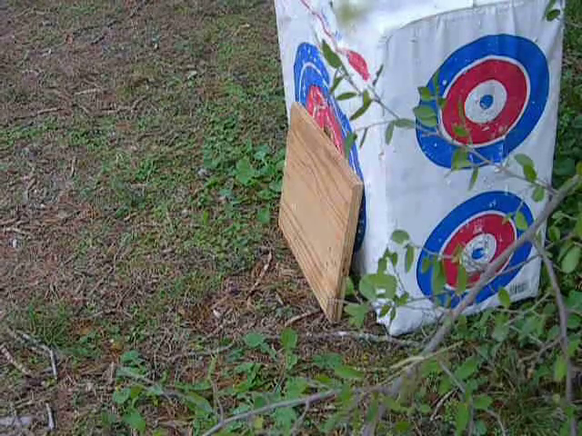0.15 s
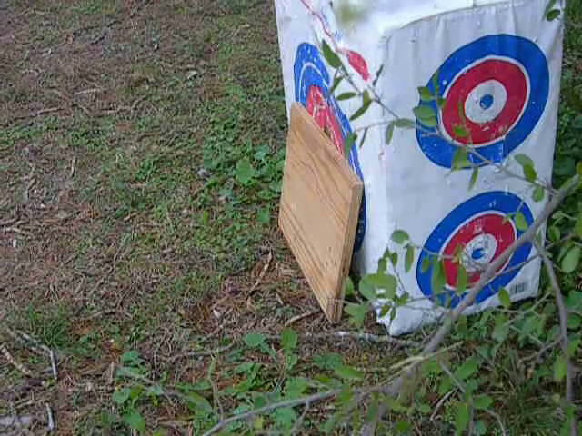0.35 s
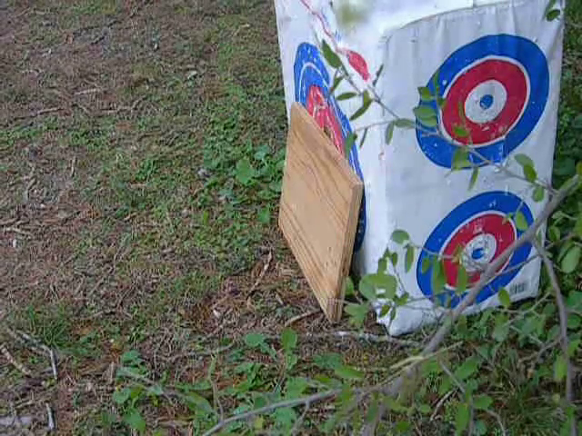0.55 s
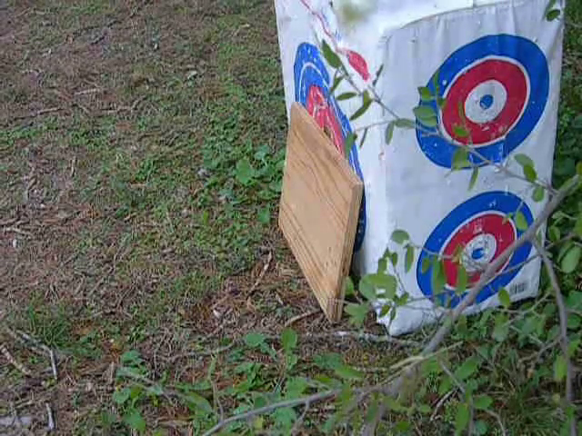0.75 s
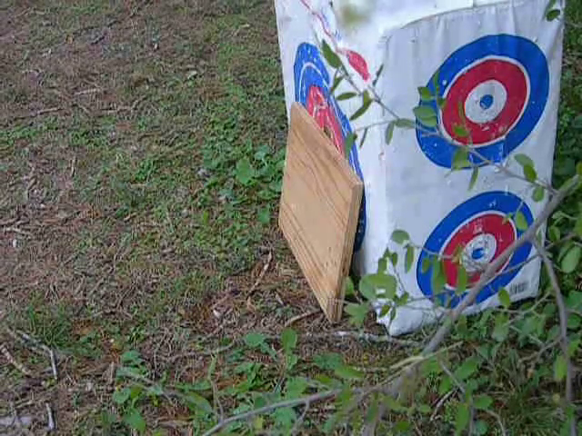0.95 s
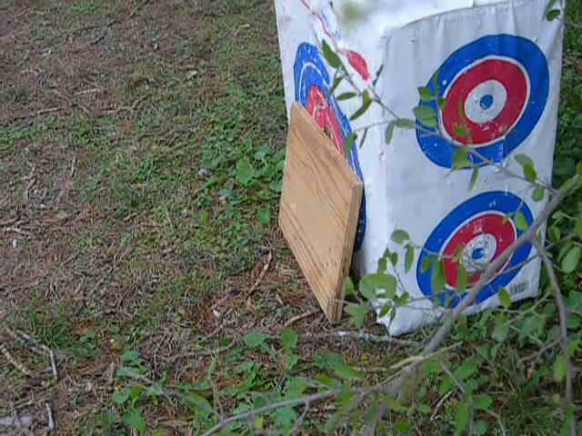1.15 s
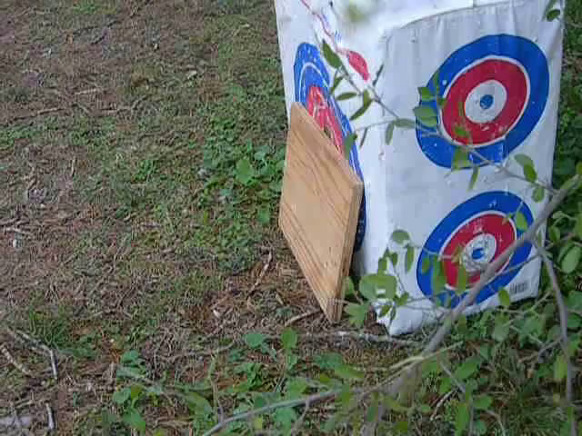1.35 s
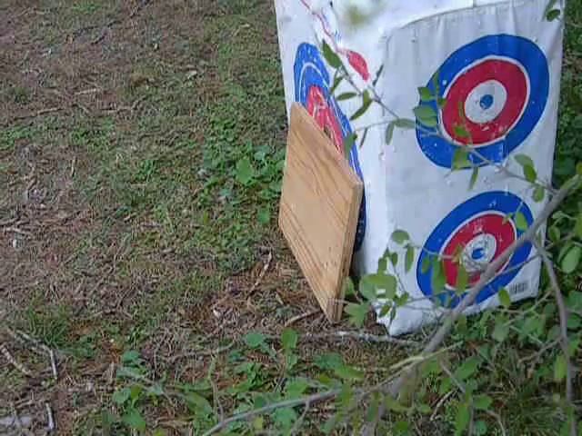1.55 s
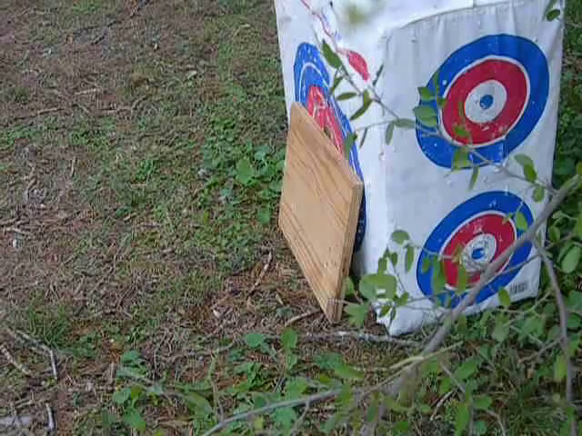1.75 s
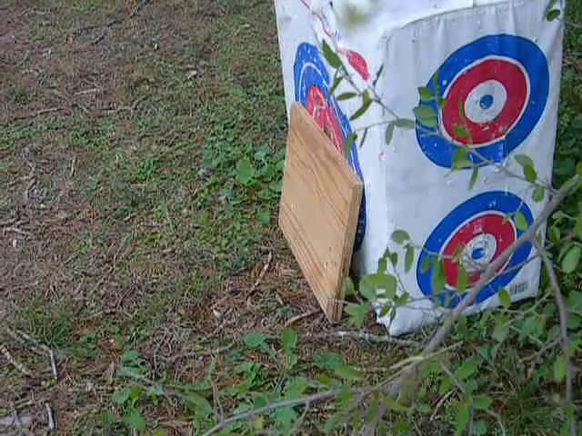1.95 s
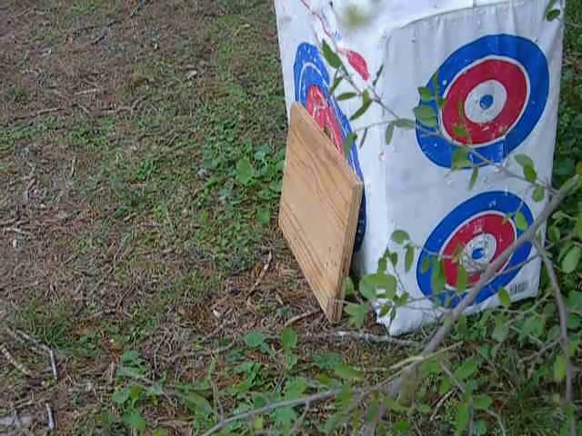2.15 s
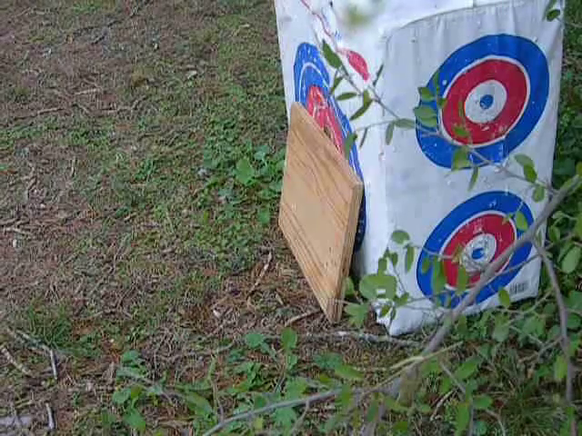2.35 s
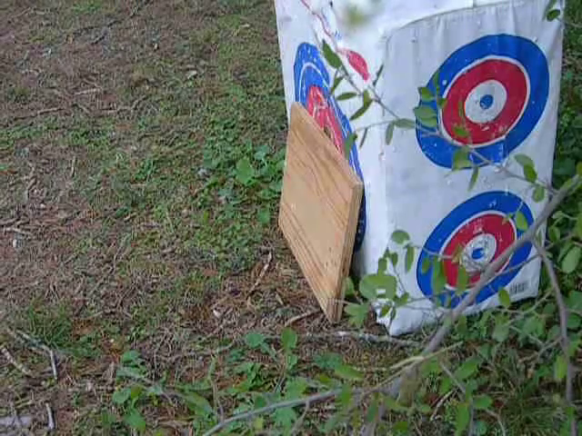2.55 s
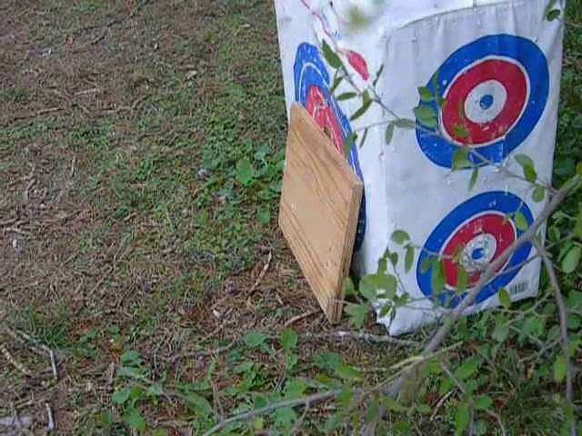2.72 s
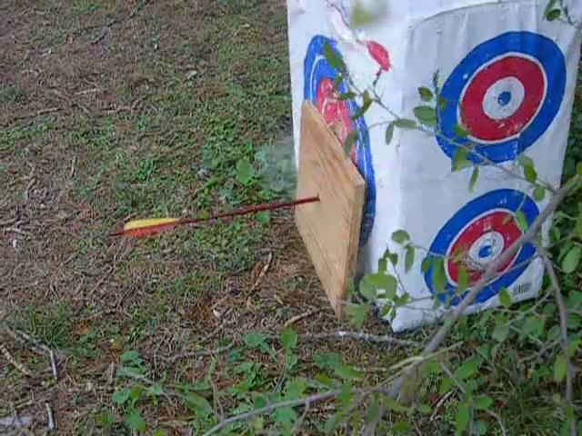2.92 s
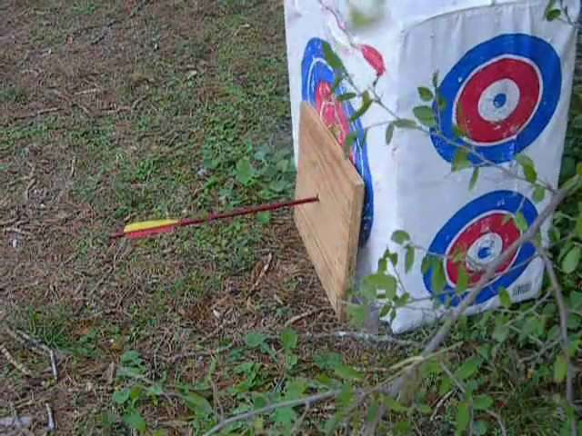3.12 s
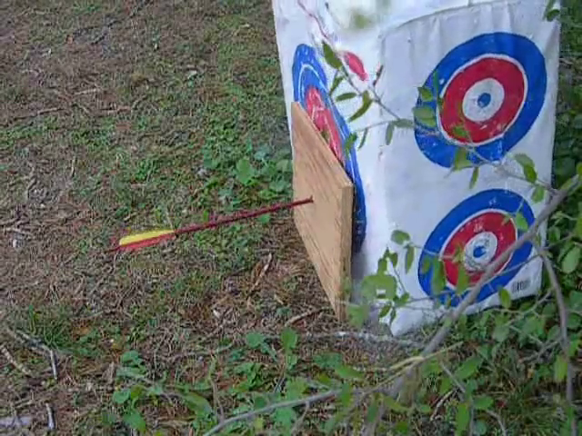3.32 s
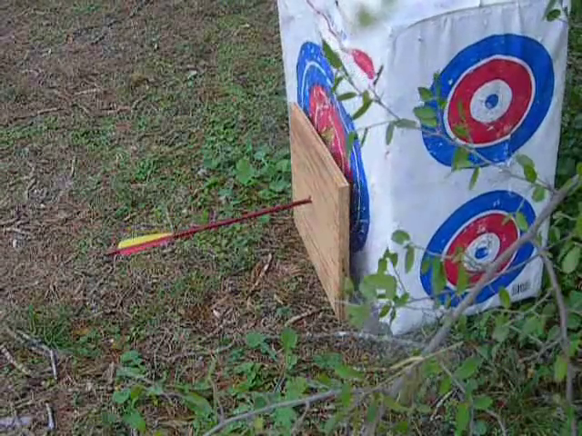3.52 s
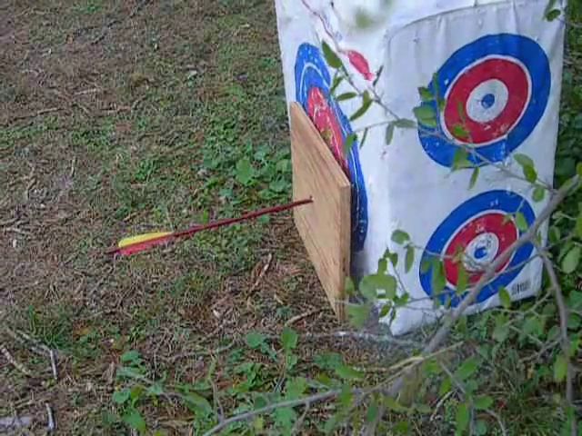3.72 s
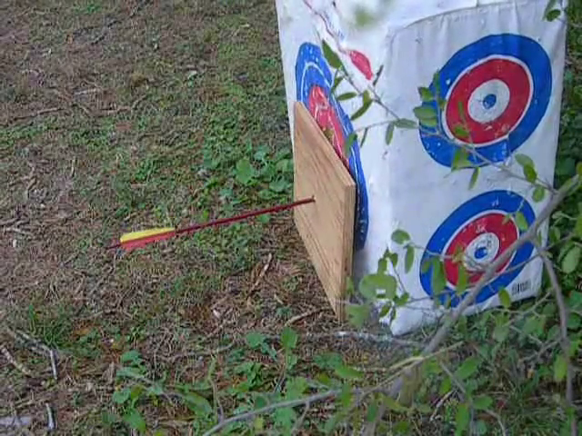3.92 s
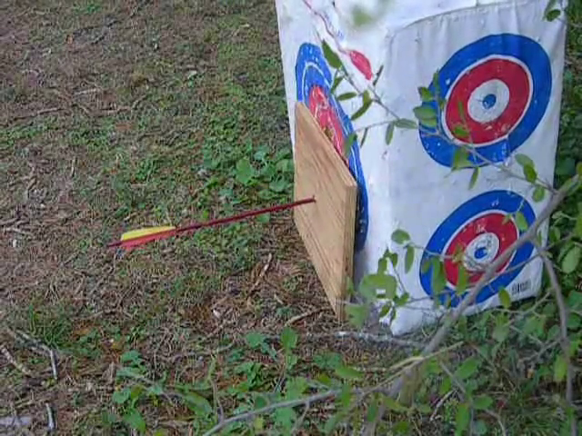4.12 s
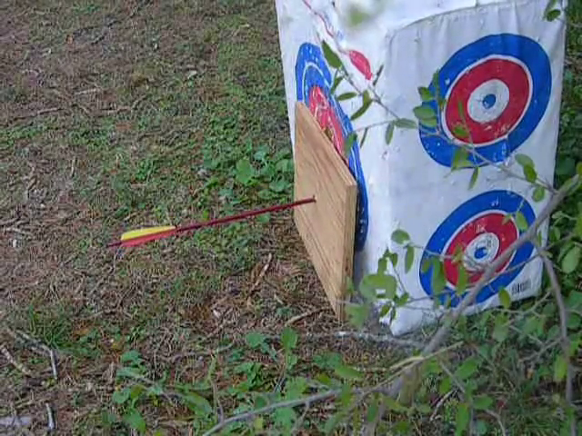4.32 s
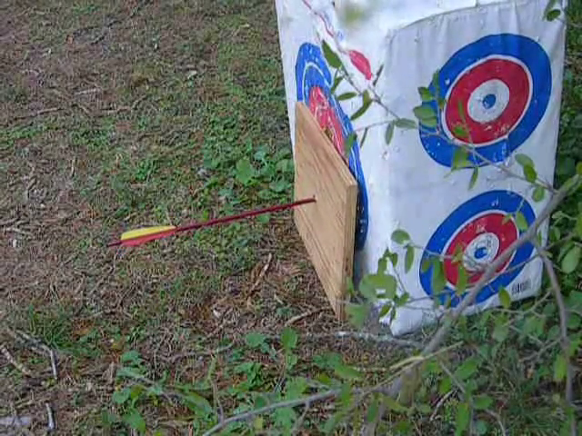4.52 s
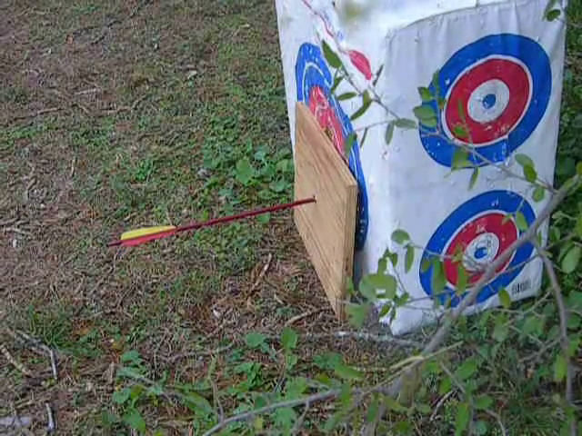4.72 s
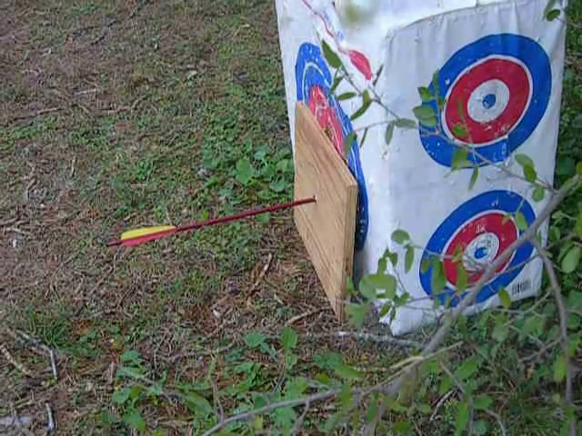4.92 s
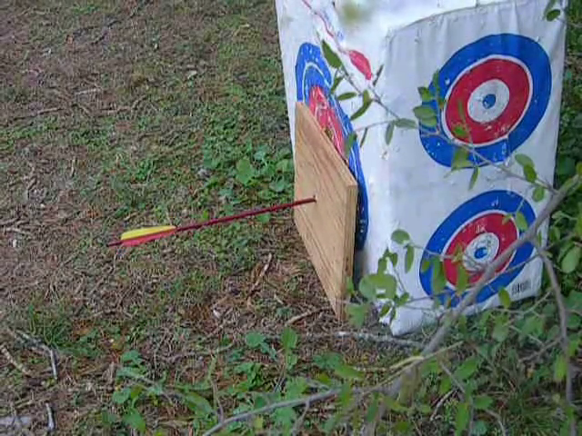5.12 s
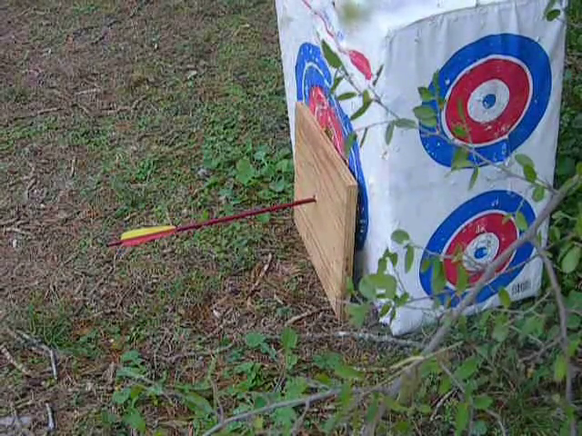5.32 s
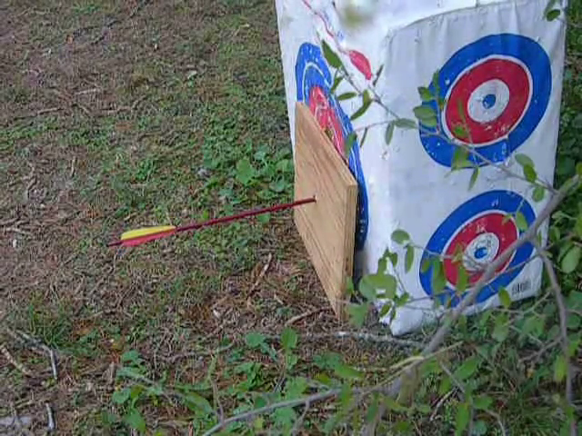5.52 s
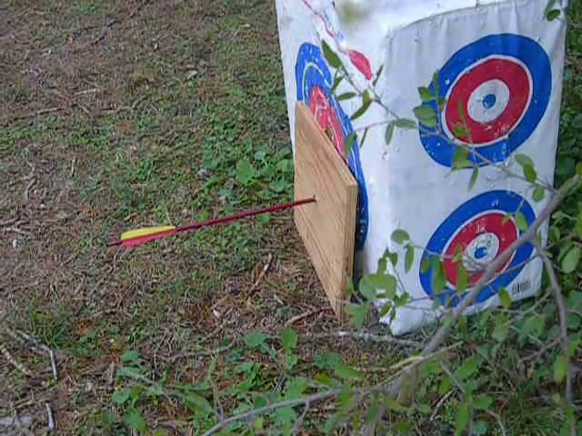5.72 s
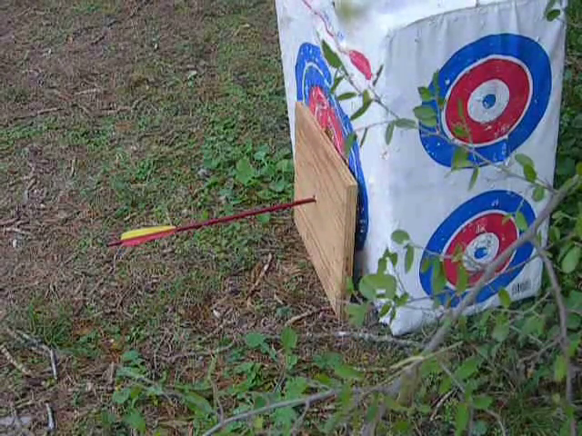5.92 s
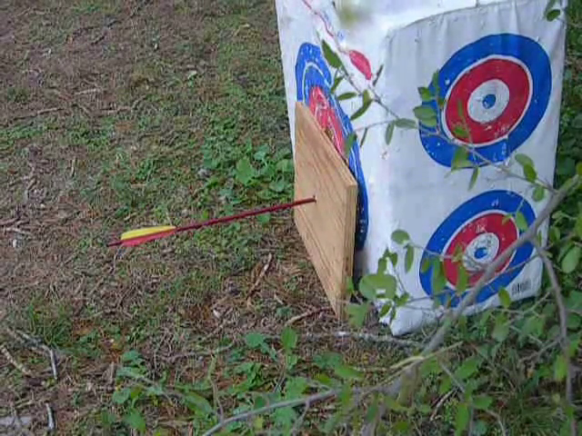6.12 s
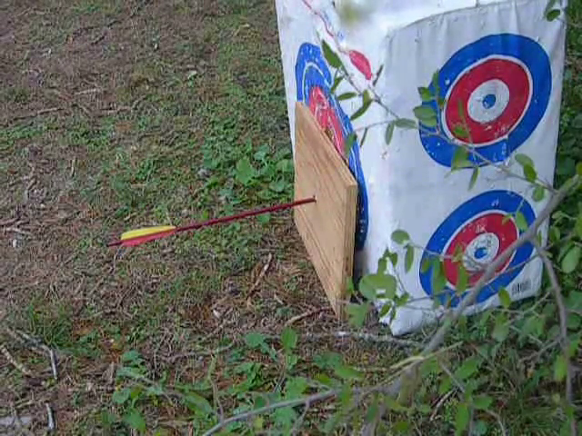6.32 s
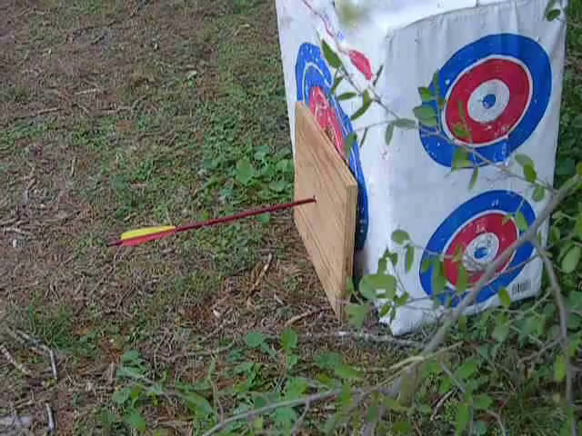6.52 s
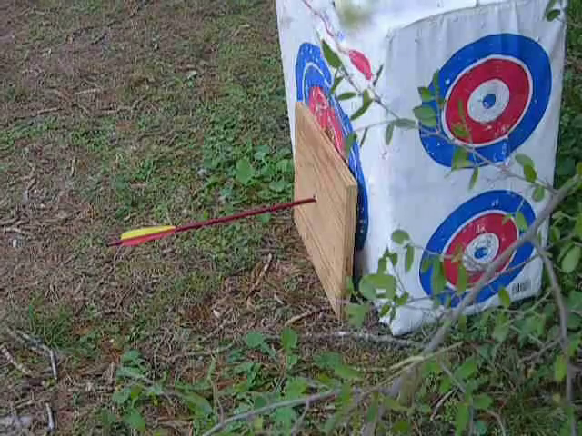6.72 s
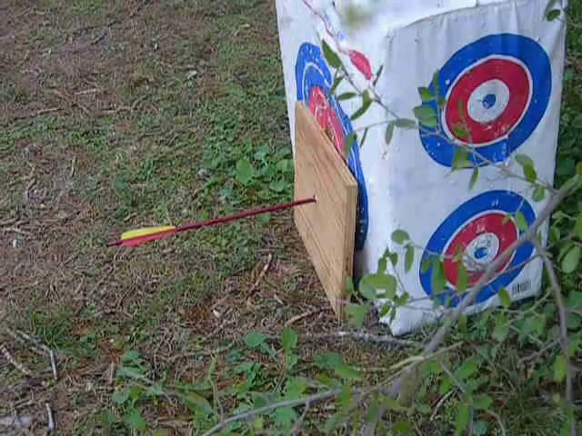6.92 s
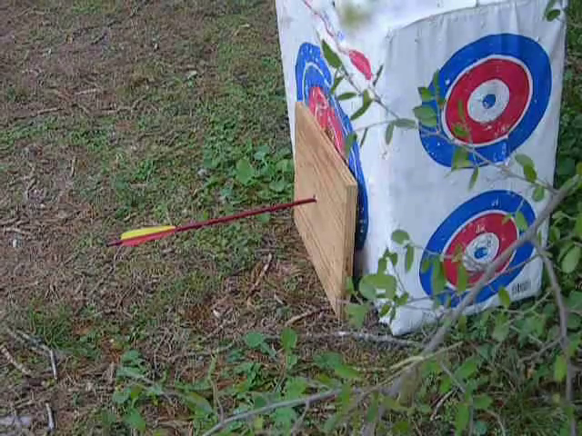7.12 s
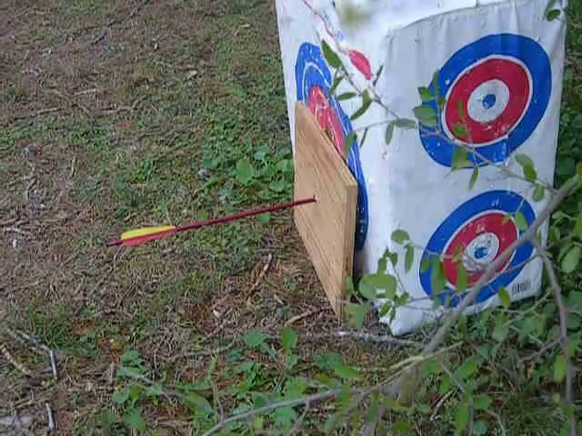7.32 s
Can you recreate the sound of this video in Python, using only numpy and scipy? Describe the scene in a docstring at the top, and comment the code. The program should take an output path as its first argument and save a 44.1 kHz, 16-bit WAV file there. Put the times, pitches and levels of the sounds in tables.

```python
"""A steady far rush with thin birdsong; a crossbow lets go with a rattling snap, its bolt cracks into plywood,
and trees throw the crack back. Rush and breeze are shaped noise, birds are gliding sines. Bow, board and trunks
are ticks and noise bursts through resonances, with dying modes for limbs and board. The mix passes a falling
gain and a clipping 8-bit converter, then plays low-rate samples as held steps."""
import sys
import numpy as np
from scipy import signal
from scipy.fft import rfft, irfft, next_fast_len
from scipy.io import wavfile
from scipy.ndimage import uniform_filter1d, map_coordinates

SR = 44100
rng = np.random.default_rng(int(sys.argv[2]) if len(sys.argv) > 2 else 0)


def put_to_file(sound):
    """Save the sound as 16-bit audio at rate SR, in the file named by the first command-line argument."""
    columns = np.atleast_2d(sound).T  # one column per channel
    safe = np.clip(columns, -1, 1)
    whole_steps = np.round(safe * 32767)
    wavfile.write(sys.argv[1], SR, whole_steps.astype(np.int16))


N = 324135

# Spectrum of the far rush. Each row: frequency in Hz, relative density in dB.
RUSH_SPECTRUM = [(18, -43.5), (30, -13), (33, -21.5), (50, -15), (98, -11), (135, -6), (319, -8.5),
                 (367, -6), (864, 0), (1870, -11), (2820, -15), (3520, -30), (3900, -33), (5070, -64),
                 (8580, -120)]
RUSH_RMS_DB, BREEZE_RMS_DB = -39, -69.5
# Soft knocks nearby. Each row: start in seconds, level in dB, frequency in Hz, t60 in seconds.
SOFT_KNOCKS = [(.615, -30.5, 587, .15), (.8465, -15, 643, 0.015), (2.885, -28.5, 545, .08),
               (4.618, -27, 900, 0.032)]

# Whistled notes. Each row: start in seconds, length in seconds, start in Hz, end in Hz,
# arch at mid-note in Hz, level in dB.
BIRD_NOTES = [(-.03, .12, 2620, 2640, 0.5, -42), (0.01, 0.084, 2340, 2340, -1, -49),
              (0.142, .22, 2625, 2630, 0, -53.5), (0.768, 0.13, 2960, 2914, 0, -51.5),
              (1.69, .03, 2840, 2840, 2, -47), (2.09, .05, 3200, 3250, -82, -48),
              (2.109, 0.063, 2720, 2760, 328, -39), (2.313, 0.05, 3050, 2584, -1, -46),
              (4.53, 0.047, 2880, 2860, 0, -54), (4.63, 0.085, 2880, 2880, 2, -53),
              (4.74, 0.044, 2860, 2790, 0, -49), (4.82, 0.037, 2800, 2860, -2, -43.5),
              (4.888, .105, 3350, 2550, -140, -44.5), (4.981, 0.056, 2700, 3260, 148, -50),
              (5.03, 0.056, 2700, 2620, 259.5, -46), (5.09, .025, 3200, 3150, 0, -49),
              (5.141, .065, 2040, 2360, 71, -47), (5.213, 0.08, 2400, 2860, 0, -50),
              (5.98, 0.11, 2820, 2770, 2.5, -51), (6.106, 0.06, 2770, 2730, -1, -45),
              (6.155, .12, 2760, 2730, -1, -48), (6.513, .022, 2610, 2610, 0, -47),
              (6.525, .105, 1900, 2570, 210, -45), (6.678, 0.099, 2500, 2600, -3, -53),
              (7.3, .07, 2900, 2440, -110, -46)]
NOTE_EDGE_SHARE = .18  # share of a note spent swelling, and again fading
FLUTTER_HZ, FLUTTER_DB = 14, 1.8  # scale of the random waver in pitch and level

# Bow contacts. Each row: time in seconds, thump level in dB.
BOW_CONTACTS = [(2.9492, 0), (2.9535, 7.5), (2.9595, 4.5), (2.9684, 2), (2.976, 5), (2.9838, 12),
                (2.9874, 7), (2.9933, 6), (3.0017, 9.5), (3.009, 8), (3.0233, 2), (3.0384, -1), (3.044, -5)]
# Bright bow parts. Each row: centre in Hz, width in Hz, level in dB.
LATCH_MODES = [(1010, 410, -6.5), (1550, 500, -3), (2050, 520, -5.5), (2650, 340, -2), (3120, 430, -4)]
# Limbs and stock. Each row: centre in Hz, width in Hz, level in dB.
STOCK_MODES = [(122, 26, -2), (197, 66, -5), (307, 80, -1.5), (429.7, 63, -3.5), (571, 68, -1.5),
               (825, 307, -11.5)]
# The catch letting go: start in seconds, then modes. Each mode: frequency in Hz, level in dB, t60 in seconds.
CATCH_RING = (2.9492, [(2900, -1, 0.029), (1504, -12, .03)])
# Limbs and stock ringing: start in seconds, then modes. Each mode: frequency in Hz, level in dB, t60 in
# seconds.
LIMB_RING = (2.968, [(122, -21, .22), (301, -15, 0.17), (548, -19, .18)])
CLACK_DB, FIRST_CLACK_DB = -6.5, 13  # clack over thump once settled; extra at release
BRIGHT_S = 0.02  # time constant of the extra's decay
# Loose parts: dying level in dB, rise time constant in seconds, t60 in seconds, lingering fizz in dB.
BUZZ_SWELL = (-15.5, .002, 0.26, -33)
# Limbs: dying level in dB, rise time constant in seconds, t60 in seconds, lingering hum in dB.
LIMB_SWELL = (-10.5, .03, 0.13, -35.5)
LINGER_S = 0.17  # counted from release

# Tip tearing through the plies: start in seconds, length in seconds, peak in dB, t60 after it in seconds.
PLY_STRIKE = (3.0918, .0062, 9, .009)
# Board colour during the tear. Each row: centre in Hz, width in Hz, level in dB.
PLY_MODES = [(331, 190, -6.5), (559.7, 150, -3.5), (950, 250, -2.5), (1603, 500, -3), (2207, 600, -1.5),
             (3102, 450, -8.5)]
# Board ringing free. Each row: frequency in Hz, level in dB, t60 in seconds.
BOARD_RING = [(549, -15.5, .65), (610, -25.5, 0.39), (320, -10, 0.071), (674, -5, 0.069), (952, -2, 0.049),
              (1526, -4, 0.028), (205, -16, .05), (125, -8, 0.052), (70, -7, .06)]
SLIPS_PER_S, SLIP_SCATTER = 2304, .03  # slips of the tip, relative deviation of their rate
# The tip drags once: time after contact in seconds, width in seconds, peak loss in slips per second.
TIP_STALL = (.0057, .0009, 520)

# Single trunks answering. Each row: arrival in seconds, crack level in dB, knock level in dB.
TRUNK_ECHOES = [(3.155, -8, 14), (3.176, 0, 6), (3.185, -1, 6), (3.204, -2, 8.5), (3.221, -4, 9),
                (3.235, -10, 4), (3.268, -12, -9), (3.296, -7, -6), (3.341, -7, -10), (3.51, -14, -4.5),
                (3.545, -10, -12), (3.562, -6, -4), (3.570, -6.5, -9)]
# Decay of the diffuse tail. Each row: frequency in Hz, t60 in seconds.
WOODS_T60 = [(300, .2), (550, 0.94), (1100, 0.45), (2100, 1.5), (3500, 1.3)]
# Colour of the trees' answer. Each row: centre in Hz, width in Hz, level in dB.
TRUNK_MODES = [(604, 200, -10), (1090, 430, -17.5), (2080, 240, 0), (2900, 400, -20)]
# The board's low note in the echoes. Each row: centre in Hz, width in Hz, level in dB.
KNOCK_MODES = [(567, 49, 2.5), (900, 500, -22)]

HOLD_SAMPLES = 5.6  # mean output samples per stored sample
BLOCK_SAMPLES, PLAYED_SAMPLES = 2865, 345  # output samples per stored block, and of it already played
STEP, OFFSET = .0076, -.0188  # converter step and standing offset, full scale = 1
TOP_HZ = 15780
# Playback filter on the stored samples. Each row: frequency in Hz, gain in dB.
PLAYBACK_FILTER = [(3000, 0), (3250, -0.5), (3550, -11), (3650, -16)]


def amp(db):
    """Amplitude factor of a level in dB."""
    return 10 ** (np.asarray(db) / 20)


def unit(x):
    """Scale to unit RMS."""
    return x / np.sqrt(np.mean(x ** 2) + 1e-20)


def along(points, hz):
    """Interpolate (Hz, value) points on a log frequency axis."""
    f, v = np.transpose(points)
    return np.interp(np.log(hz + 1), np.log(f + 1), v)


def filtered(x, response):
    """Multiply the spectrum of x by a response of frequency."""
    m = next_fast_len(N + SR // 2)
    return irfft(rfft(x, m) * response(np.fft.rfftfreq(m, 1 / SR)), m)[..., :N]


def body(modes):
    """Response of a causal sum of resonances with alternating signs."""
    def response(f):
        total = 0
        for k, (centre_hz, width_hz, db) in enumerate(modes):
            damping = 1j * f * width_hz
            total = total + (-1) ** k * amp(db) * damping / (centre_hz ** 2 - f * f + damping)
        return total
    return response


def puffs(times_s, levels_db, t60_s, snap):
    """Short dying noise bursts, each led by a one-sample tick."""
    out, t = np.zeros(N + 1000), np.arange(1000) / SR
    noises = rng.standard_normal((len(times_s), 1000))
    for s, db, noise in zip(times_s, levels_db, noises):
        out[round(s * SR):][:1000] += amp(db - 60 * t / t60_s) * (noise + snap * (t == 0))
    return out[:N]


def ring(start_s, hz, db, t60_s):
    """One dying mode with a soft start."""
    t = np.maximum(np.arange(N) / SR - start_s, 0)
    return amp(db - 60 * t / t60_s) * np.sin(2 * np.pi * hz * t) * (1 - np.exp(-t * hz))


def swell(start_s, db, rise_s, t60_s, linger_db):
    """Envelope that rises and dies away over a faint steady rest that stops after LINGER_S."""
    t = np.maximum(np.arange(N) / SR - start_s, 0)
    dying = amp(db - 60 * t / t60_s)
    rest = amp(linger_db) * (t < LINGER_S)
    return (1 - np.exp(-t / rise_s)) * (dying + rest)


def rush():
    """Faintly patchy far noise, a breeze bumping the microphone as lumpy low noise, and dying soft knocks."""
    z = signal.stft(rng.standard_normal(N), nperseg=1024)[2]
    patches = uniform_filter1d(rng.standard_normal(z.shape), 8, 0)
    patches = uniform_filter1d(patches, 6, 1)
    noise = signal.istft(z * amp(1.2 * unit(patches)), nperseg=1024)[1][:N]
    far = amp(RUSH_RMS_DB) * unit(filtered(noise, lambda hz: amp(along(RUSH_SPECTRUM, hz))))
    lumps = amp(8 * map_coordinates(rng.standard_normal(80), [np.arange(N) * 9 / SR]))  # 9 knots/s
    bumps = filtered(lumps * rng.standard_normal(N), body([(55.6, 50, 0)]))
    breeze = amp(BREEZE_RMS_DB) * unit(bumps)
    knocks = sum(ring(s, hz, db, t60_s) for s, db, hz, t60_s in SOFT_KNOCKS)
    return far + breeze + knocks


def birds():
    """Thin whistled notes: sine glides with an arch and a slight flutter, smeared by leaves."""
    out = np.zeros(N)
    flutter_knots = rng.standard_normal((len(BIRD_NOTES), 40))
    for (s, length_s, start_hz, end_hz, arch_hz, db), knots in zip(BIRD_NOTES, flutter_knots):
        t = np.arange(round(length_s * SR)) / SR
        u = t / length_s
        flutter = map_coordinates(knots, [t * 100])  # 100 knots/s
        glide_hz = start_hz + (end_hz - start_hz) * u + 4 * arch_hz * u * (1 - u)
        hz = glide_hz + FLUTTER_HZ * flutter
        edge = np.clip(np.minimum(u, 1 - u) / NOTE_EDGE_SHARE, 0, 1)
        level = amp(db + FLUTTER_DB * flutter[::-1])
        note = level * edge * np.sin(2 * np.pi * np.cumsum(hz) / SR)
        start = round(s * SR)
        at = max(start, 0)
        out[at:start + len(t)] += note[at - start:][:N - at]
    smear = .015 * amp(-60 * np.arange(4000) / SR / .12) * rng.standard_normal(4000)
    return signal.fftconvolve(out, np.r_[1, smear])[:N]


def crossbow():
    """Latch and limbs clack, ring and thump; loose parts buzz while the limbs shake out."""
    s, thump_db = np.transpose(BOW_CONTACTS)
    clack_db = thump_db + CLACK_DB + FIRST_CLACK_DB * np.exp(-(s - s[0]) / BRIGHT_S)
    clacks = filtered(puffs(s, clack_db, 0.0041, snap=2.7), body(LATCH_MODES))
    thumps = filtered(puffs(s, thump_db, 0.012, snap=8.1), body(STOCK_MODES))
    # Noise whose level jumps at random every 60 samples.
    jumps = amp(3.1 * rng.standard_normal((2, N // 60 + 1))).repeat(60, 1)[:, :N]
    grit = rng.standard_normal((2, N)) * jumps
    buzz = swell(s[0], *BUZZ_SWELL) * unit(filtered(grit[0], body(LATCH_MODES)))
    shake = swell(s[0], *LIMB_SWELL) * unit(filtered(grit[1], body(STOCK_MODES)))
    rings = sum(ring(at_s, *mode) for at_s, modes in (CATCH_RING, LIMB_RING) for mode in modes)
    return rings + clacks + thumps + buzz + shake


def board():
    """The tip slips through the plies at a quick uneven rate for a few ms; the board rings on."""
    start_s, length_s, peak_db, t60_s = PLY_STRIKE
    stall_s, stall_width_s, slips_lost_per_s = TIP_STALL
    t = np.arange(N) / SR - start_s
    onset = np.clip(t / 0.00068, 0, 1)
    after = np.maximum(t - length_s, 0)
    scatter = rng.standard_normal(N // 50 + 1).repeat(50)[:N]
    rate = SLIPS_PER_S * (1 + SLIP_SCATTER * scatter)
    rate = rate - slips_lost_per_s * np.exp(-((t - stall_s) / stall_width_s) ** 2)
    slips = np.diff(np.floor(np.cumsum((t > 0) * rate) / SR), prepend=0)  # a tick per whole cycle
    # Fibres go on snapping after the tip stops.
    splinters = amp(-16 - 60 * after / 0.051) * rng.standard_normal(N)
    tear = filtered(onset * (slips * amp(-60 * after / t60_s) + splinters), body(PLY_MODES))
    crack = amp(peak_db) * tear / np.abs(tear).max()
    hum = sum(ring(start_s + .006, *mode) for mode in BOARD_RING)
    return crack + hum


def woods():
    """Single trunks answer the strike as distinct echoes over a diffuse tail with decay set by frequency."""
    hz, t, z = signal.stft(rng.standard_normal(SR), SR, nperseg=256)
    decay = amp(-60 * t / along(WOODS_T60, hz)[:, None])
    tail = signal.istft(z * decay, SR, nperseg=256)[1][:SR]
    tail *= 1 - np.exp(-np.arange(SR) / SR / .05)  # the farther trees join late
    start = round(PLY_STRIKE[0] * SR)
    diffuse = filtered(np.pad(tail, (start, N - SR - start)), body(TRUNK_MODES))
    s, crack_db, knock_db = np.transpose(TRUNK_ECHOES)
    cracks = filtered(puffs(s, crack_db, .014, snap=3.6), body(TRUNK_MODES))
    knocks = filtered(puffs(s, knock_db, .012, snap=2.2), body(KNOCK_MODES))
    return amp(-7.5) * diffuse + cracks + knocks


def scene():
    """Sum all sources into one channel."""
    return (rush() + birds() + crossbow() + board() + woods())[None]


def gain_control(x, over_db, ratio, most_db, db_per_s, attack_s):
    """Loud stretches pull the gain down; it creeps back at a steady rate in dB."""
    t = np.arange(N) / SR
    power = np.abs(uniform_filter1d(x ** 2, size=220))  # 5 ms mean
    excess_db = ratio * (10 * np.log10(power + 1e-12) - over_db)
    held_db = np.maximum.accumulate(excess_db + db_per_s * t) - db_per_s * t
    cut_db = np.clip(held_db, 0, most_db)
    k = np.exp(-1 / (attack_s * SR))
    return x * amp(-signal.lfilter([1 - k], [1, -k], cut_db))


def record(dry):
    """Input filter, gain control, clipping 8-bit converter, playback as held steps restarted each block."""
    x = signal.sosfilt(signal.butter(6, 3400, fs=SR, output="sos"), dry[0])
    x = gain_control(x, over_db=-8, ratio=1.69, most_db=11, db_per_s=27.5, attack_s=.05)
    i = np.arange(N) + PLAYED_SAMPLES
    stored_index = i // BLOCK_SAMPLES * BLOCK_SAMPLES + i % BLOCK_SAMPLES // HOLD_SAMPLES
    fresh = np.diff(stored_index, prepend=-1) > 0  # a new stored sample begins
    stored = STEP * np.clip(np.round((x[fresh] + OFFSET) / STEP), -128, 127)
    hz = np.fft.rfftfreq(len(stored), HOLD_SAMPLES / SR)
    stored = irfft(rfft(stored) * amp(along(PLAYBACK_FILTER, hz)), len(stored))
    held = stored[np.cumsum(fresh) - 1]
    return np.clip(filtered(held, lambda hz: hz < TOP_HZ), -1, 1)[None]


dry = scene()
out = record(dry)
put_to_file(out)
```